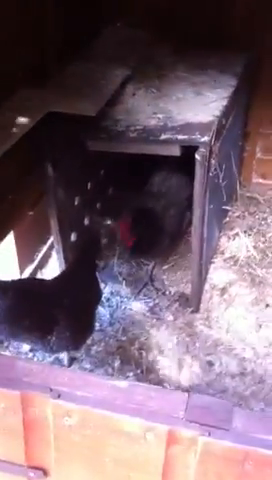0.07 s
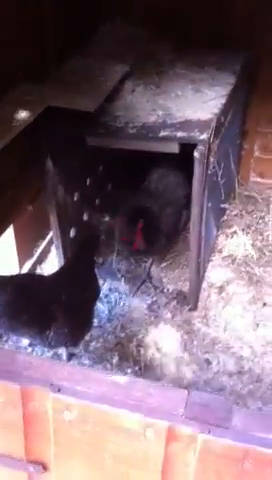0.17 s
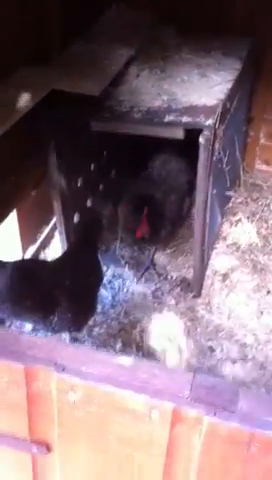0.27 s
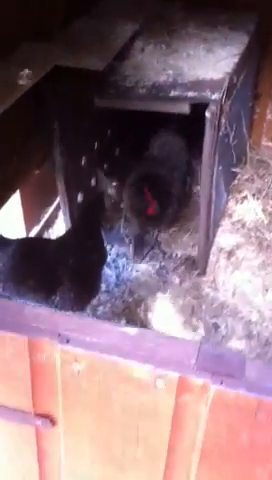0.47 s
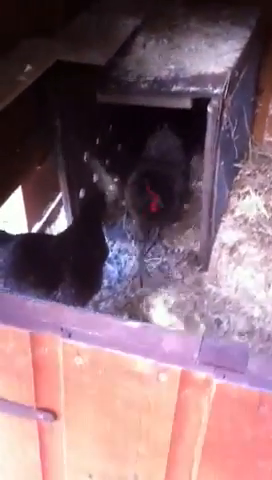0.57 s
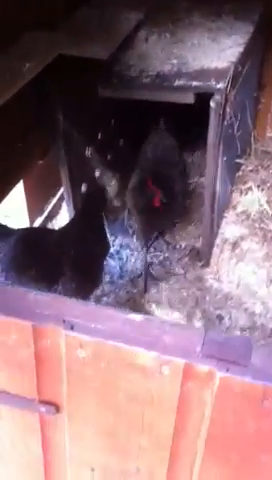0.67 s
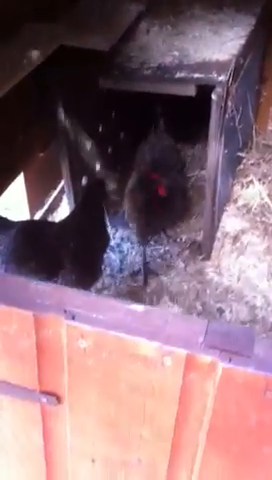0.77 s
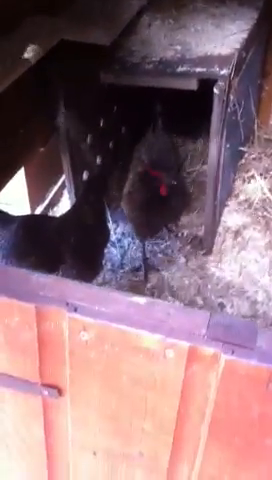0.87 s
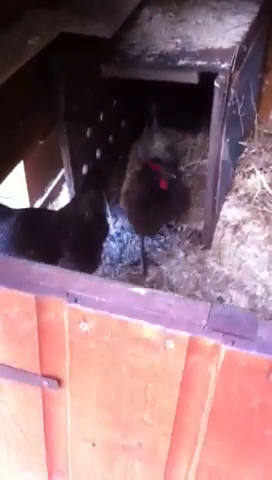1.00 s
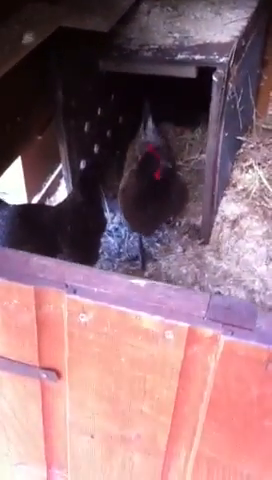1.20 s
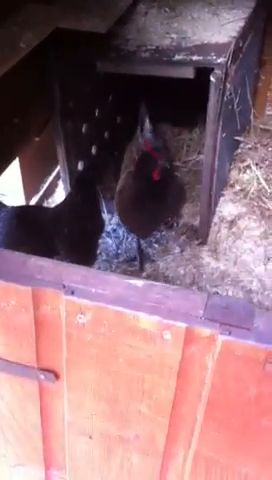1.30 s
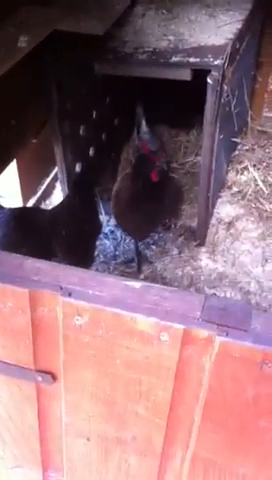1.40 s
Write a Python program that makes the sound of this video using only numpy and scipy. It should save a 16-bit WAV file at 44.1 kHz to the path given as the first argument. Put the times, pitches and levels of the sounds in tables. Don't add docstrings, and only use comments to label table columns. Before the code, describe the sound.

Hen clucking and squawking, close, in a small wooden coop with short dull echo. Over faint low yard hum, a second hen coos softly at 0.1 s. Short clucks come at 0.2, 0.4, 0.6 and 0.85 s, the first low and smooth, the others rougher and louder. A loud, buzzing squawk lasts from 0.95 to 1.28 s. Feet tick faintly in litter; another hen's quieter call starts near 1.4 s and is cut off.

```python
import sys
import numpy as np
from scipy import signal
from scipy.fft import rfft, irfft
from scipy.io import wavfile
from scipy.ndimage import uniform_filter1d

SR = 44100
rng = np.random.default_rng(int(sys.argv[2]) if len(sys.argv) > 2 else 0)


def ratio_of_db(decibels):
    return 10 ** (np.asarray(decibels, float) / 20)


def file_out(sig):
    cols = np.atleast_2d(sig).T
    lim = np.clip(cols, -1, 1)
    pcm = np.round(lim * 32767).astype(np.int16)
    wavfile.write(sys.argv[1], SR, pcm)


N = 63945


def unit(x):
    return x / np.sqrt(np.mean(x ** 2))


def ring(x, hz, width):
    b, a = signal.iirpeak(hz, hz / width, fs=SR)
    return signal.lfilter(b, a, signal.lfilter(b, a, x))


def walk(rate):
    k = int(SR / rate)
    return unit(uniform_filter1d(uniform_filter1d(rng.standard_normal(N), k), k))


def yard():
    # f/Hz, level/dB per Hz
    hum_spectrum = [(15, -46), (25, -43), (240, -1.5), (469, -26), (703, -5), (919, -19), (1570, -22),
                    (1850, -23), (15500, -40.5)]
    spectrum_hz, spectrum_db = np.array(hum_spectrum).T
    hum, swell = 0, walk(8.6)
    for hz in 28 * 2 ** np.arange(0, 9.2, .5):
        db = np.interp(np.log(hz), np.log(spectrum_hz), spectrum_db)
        gain = ratio_of_db(db + 3.26 * swell + 2.26 * walk(5))
        hum = hum + gain * ring(rng.standard_normal(N), hz, hz / 2)
    return unit(hum) * ratio_of_db(-51)


def tone(t, rows, fade_s, twelfth_db):
    s, hz, low_db, octave_db = np.array(rows).T
    phase = 2 * np.pi * np.cumsum(np.interp(t, s, hz)) / SR
    fade_in = np.clip((t - s[0]) * 200, 0, 1)
    fade_out = np.clip(1 - (t - s[-1]) / fade_s, 0, 1)
    low = ratio_of_db(np.interp(t, s, low_db)) * np.sin(phase)
    upper = np.sin(2 * phase + 1) + ratio_of_db(twelfth_db) * np.sin(3 * phase)
    return np.sqrt(2) * fade_in * fade_out * (low + ratio_of_db(np.interp(t, s, octave_db)) * upper)


def coo(t):
    # t/s, f/Hz, level/dB, octave level/dB
    coo_rows = [
        (0.12, 173.2, -62, -90),
        (0.142, 167, -41.5, -48),
        (0.167, 172, -39.5, -48.5),
        (.2, 154, -46, -47),
        (0.226, 146, -52.5, -63),
    ]
    return tone(t, coo_rows, 0.0088, -12)


def voice(rows, throat, tilt, steady=1.):
    rows = np.array(rows)
    i0, i1 = int(rows[0, 0] * SR), min(int(rows[-1, 0] * SR), N)
    t = np.arange(i0, i1) / SR
    db, hz, half, rough = (np.interp(t, rows[:, 0], c) for c in rows.T[1:])
    hiss = rng.standard_normal(len(t))

    cycles = np.cumsum(hz) / SR
    timing, luck = (np.interp(cycles, np.arange(1000), c) for c in rng.standard_normal((2, 1000)))
    jitter = 0.029
    phase = cycles + np.cumsum(hz * jitter * 10 * rough * timing) / SR
    harmonics = range(1, int(6000 / hz.max()))
    pulses = unit(sum(np.cos(2 * np.pi * h * phase) for h in harmonics))

    two_cycle = 1 + half * np.cos(np.pi * phase)
    four_cycle = 1 + 0.3 * np.cos(np.pi * phase / 2)
    size = two_cycle * four_cycle * ratio_of_db(9 * rough * np.tanh(luck))
    puffs = hiss * (1 + .5 * np.cos(2 * np.pi * phase))
    breath = size * puffs * ratio_of_db(-5) * (rough + .12)
    bright = ratio_of_db(tilt * (db - db.max()))

    low, mid, high = np.zeros((3, N))
    low[i0:i1] = ((size - 1 + steady) * pulses + breath) * ratio_of_db(db)
    mid[i0:i1] = low[i0:i1] * bright
    high[i0:i1] = 2 * puffs * size ** 0.25 * ratio_of_db(db) * bright
    out = 0
    for k, (f, width, gain_db) in enumerate(throat):
        source = low if f < 950 else mid if f < 4300 else high
        out = out + (-1) ** k * ratio_of_db(gain_db) * ring(source, f, width)
    return out * np.sqrt(np.sum(ratio_of_db(2 * db)) / np.sum(out ** 2))


def clucks():
    # t/s, length/s, level/dB, f/Hz, roughness/0-1
    cluck_rows = [
        (0.181, 0.047, -24.5, 270, 0.04),
        (0.375, 0.065, -22.5, 377.5, 0.42),
        (0.613, 0.075, -21, 369, 0.41),
        (0.841, 0.069, -18.5, 385.2, .3),
    ]
    # brightness/dB, then level at its opening and at its stop, from the top/dB
    brightness = [-6.5, -0.5, -2, -1]
    opening = [-8, -12.5, -11.5, -12]
    stopping = [-4.5, -11.5, -15, -9]
    # f/Hz, width/Hz, level/dB
    lower_throat = [(270, 53, -12), (498, 180, -17.5), (845, 300, 0), (1015, 250, 3), (1277, 300, -5)]
    upper_throat = [(1800, 300, -13), (2250, 350, -14), (3850, 300, -16), (5100, 700, -24),
                    (6200, 1200, -23), (10500, 6000, -29), (2850, 250, -13), (3120, 280, -7)]
    rise_share, hold_share, sag = .35, 0.31, 0.65
    out = 0
    for cluck, bright_db, rise_db, fall_db in zip(cluck_rows, brightness, opening, stopping):
        s, length, db, hz, rough = cluck
        held_until = s + (rise_share + hold_share) * length
        # t/s, level/dB, f/Hz, strong-weak depth/0-1, roughness/0-1
        effort = [(s, db + rise_db, hz, .1, 0.34 * rough),
                  (s + rise_share * length, db + 1.0, hz, .2, 0.76 * rough),
                  (held_until, db + 0.7, hz * (1 - sag * rough), .3, rough),
                  (s + length, db + fall_db, hz * (1 - sag * rough * 2), .3, 1.63 * rough)]
        throat = lower_throat + [(f, width, g + bright_db) for f, width, g in upper_throat]
        out = out + voice(effort, throat, .35)
    rumble = unit(ring(rng.standard_normal(N), 36, 90))
    return out + ratio_of_db(-36) * rumble * uniform_filter1d(np.abs(out), SR // 40)


def ticks(t):
    # t/s, peak level/dB, f/Hz, t60/s
    tick_rows = [
        (0.5261, -35.5, 1690, 0.035),
        (0.7233, -43, 5150, 0.13),
        (0.764, -37.5, 2400, 0.029),
        (1.3238, -36, 2060, 0.032),
    ]
    out = 0
    for s, db, hz, t60 in tick_rows:
        burst = rng.standard_normal(N) * (t > s) * ratio_of_db(-60 * np.maximum(t - s, 0) / t60)
        scratch = ring(burst, hz, 1200) + ratio_of_db(-12) * ring(burst, 1.36 * hz, 1500)
        scratch = scratch + ratio_of_db(-14) * ring(burst, 4700, 9500)
        thud = ratio_of_db(-3.5) * ring(burst, 174, 170)
        out = out + ratio_of_db(db) * (scratch + thud) / np.abs(scratch).max()
    return out


def squawk():
    # t/s, level/dB, f/Hz, strong-weak depth/0-1, roughness/0-1
    squawk_effort = [
        (.944, -34, 691.5, 1, 0.37),
        (.956, -11, 695.8, 0.63, 0.31),
        (1.0, -15, 690.8, 0.67, 0.14),
        (1.09, -16.5, 657.5, 0.62, .1),
        (1.125, -16, 667, 0.12, 0.31),
        (1.198, -17, 672.7, 0.13, 0.09),
        (1.216, -17.5, 700.5, 0.94, 0.21),
        (1.258, -25.5, 677, 0.76, 0.42),
        (1.285, -58, 670, 0.9, 0.3),
    ]
    # f/Hz, width/Hz, level/dB
    open_throat = [(454, 126, -25), (693, 155, -0.5), (1108, 363, 2.5), (1400, 120, 4.5), (1770, 460, -6.5),
                   (2060, 89, -1), (2347, 338, -2), (2890, 560, -14.5), (3460, 245, -9.5),
                   (5060, 1220, -17.5), (6020, 390, -19), (7000, 2300, -26.5), (8870, 1700, -29),
                   (11600, 6400, -36)]
    return voice(squawk_effort, open_throat, 0.15, .05)


def clear_tone(t):
    # t/s, f/Hz, level/dB, octave level/dB
    clear_rows = [(.951, 694, -34, -50), (.972, 695, -20, -30), (1.0, 686, -22, -19),
                  (1.066, 683, -22, -17), (1.088, 662, -36, -22), (1.117, 670, -24, -30),
                  (1.13, 676, -24, -17), (1.167, 676, -25, -15.5), (1.215, 680, -26, -22)]
    return tone(t, clear_rows, .03, -14)


def seven_quarter_tone(t):
    # t/s, f/Hz, level/dB, octave level/dB
    seven_quarter_rows = [(1.0, 1150, -44, -26), (1.06, 1150, -33, -33.5), (1.085, 1155, -16, -27),
                          (1.111, 1160, -22, -38), (1.134, 1172, -42, -37.5), (1.17, 1178, -39, -29),
                          (1.2, 1178, -24, -41)]
    return tone(t, seven_quarter_rows, 0.043, -6)


def reply():
    # t/s, level/dB, f/Hz, strong-weak depth/0-1, roughness/0-1
    reply_effort = [
        (1.369, -50, 400, .3, .6),
        (1.386, -40, 420, .3, .4),
        (1.392, -29, 440, .1, .12),
        (1.415, -27, 460, .15, .15),
        (1.43, -27, 455, .5, .2),
        (1.45, -28, 420, .6, .25),
    ]
    # f/Hz, width/Hz, level/dB
    reply_throat = [(245, 70, -31), (960, 810, 0.5), (1400, 670, 3), (1694, 260, 10), (2600, 1020, -6.5),
                    (4230, 970, -8), (5320, 820, -8), (8030, 2900, -18.5), (11800, 15000, -33)]
    return voice(reply_effort, reply_throat, -0.27)


def decay(t60):
    t = np.arange(SR // 4) / SR
    echo = rng.standard_normal(len(t)) * ratio_of_db(-60 * t / t60)
    return echo / np.sqrt(np.sum(echo ** 2))


def nest_box(x):
    bass = signal.sosfiltfilt(signal.butter(3, 1320, fs=SR, output="sos"), x)
    walls = rfft(decay(.025), 2 * N)
    walls = walls / np.sqrt(np.abs(walls))
    walls = walls / np.sqrt(np.mean(np.abs(walls) ** 2))
    return bass + irfft(rfft(x - bass, 2 * N) * walls)[:N]


def coop(x):
    b, a = signal.butter(2, 1700, fs=SR)
    return ratio_of_db(-4) * signal.fftconvolve(x, signal.lfilter(b, a, decay(0.14)))[:N]


def duck(x):
    k = 1 / (0.061 * SR)
    loudness = signal.lfilter([k], [1, k - 1], np.abs(x))
    return ratio_of_db(-18 * np.tanh(loudness / ratio_of_db(-9)))


def scene():
    t = np.arange(N) / SR
    hens = nest_box(clucks() + ticks(t) + squawk() + reply()) + seven_quarter_tone(t)
    mix = duck(hens) * yard() + coo(t) + hens + coop(hens) + clear_tone(t)
    return mix[None]


def low_pass(x):
    return signal.sosfilt(signal.butter(12, 15920, fs=SR, output="sos"), x)


def record(dry):
    limit = .85
    rounding = limit * np.tanh(dry / limit) - dry
    no_rumble = signal.butter(4, 450, "high", fs=SR, output="sos")
    mix = dry + signal.sosfilt(no_rumble, rounding)
    return low_pass(mix)


dry = scene()
out = record(dry)
file_out(out)
```